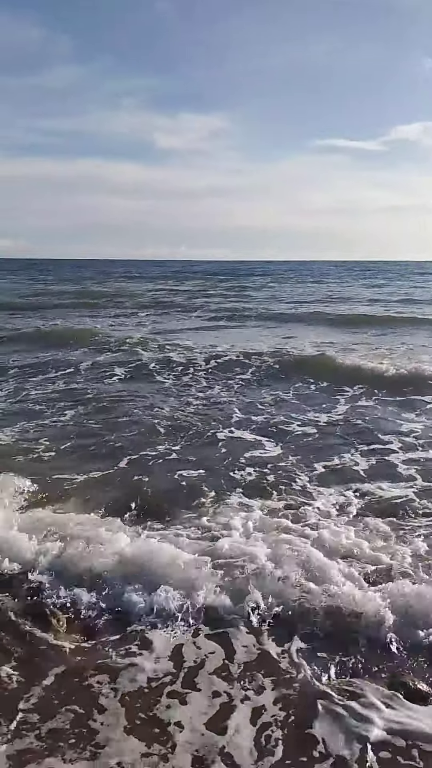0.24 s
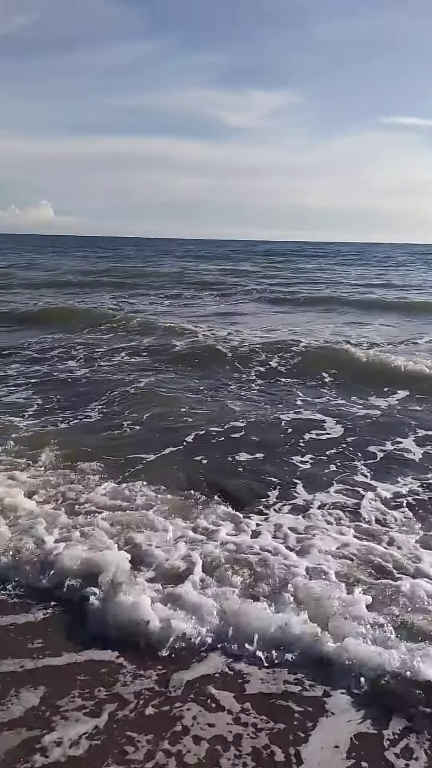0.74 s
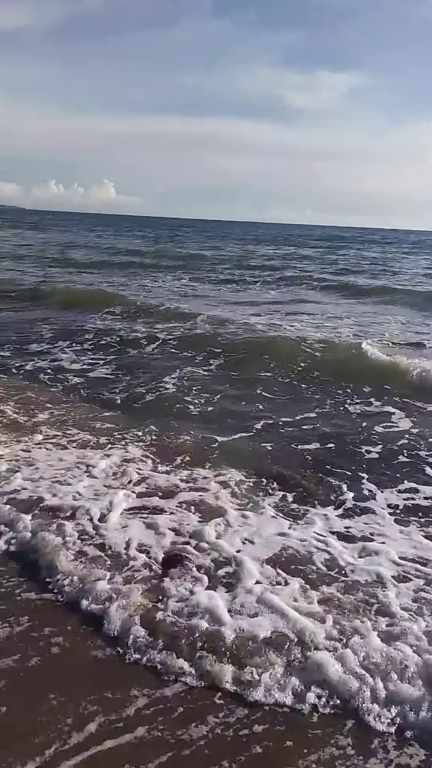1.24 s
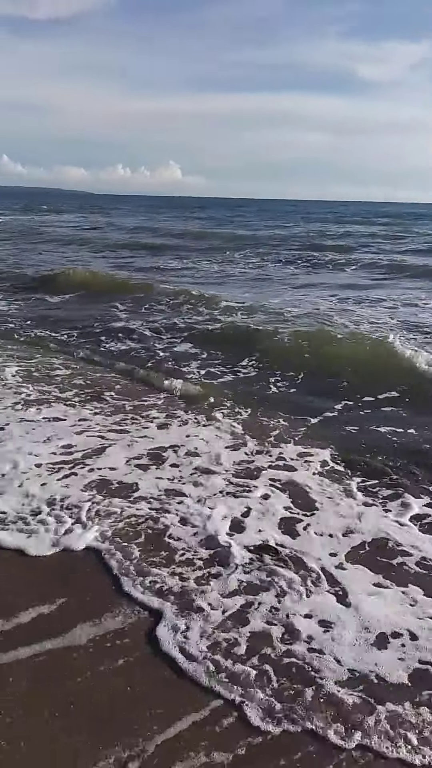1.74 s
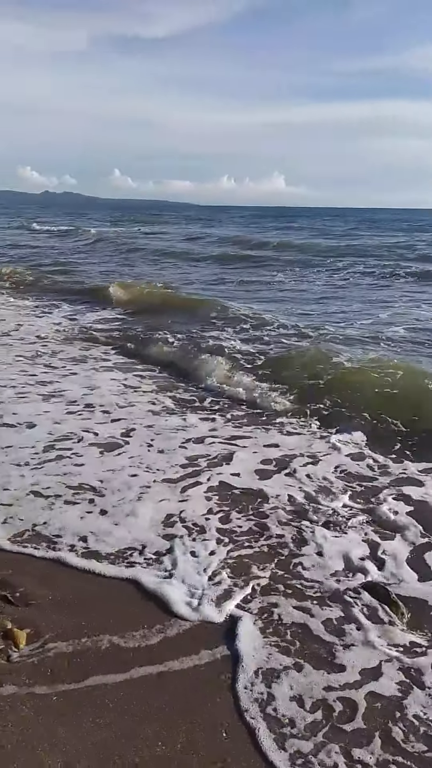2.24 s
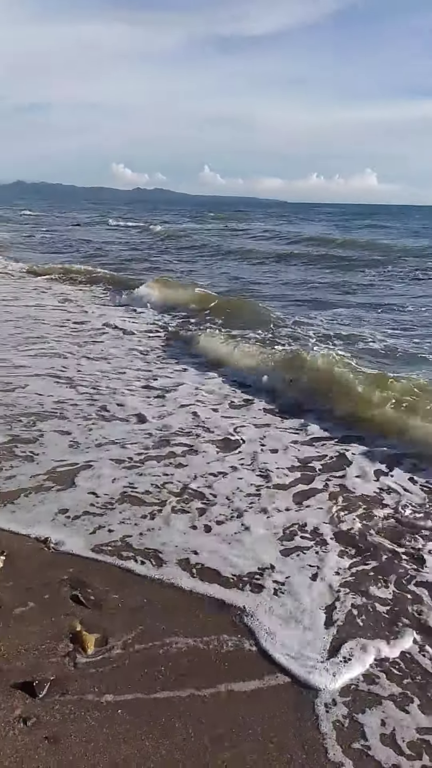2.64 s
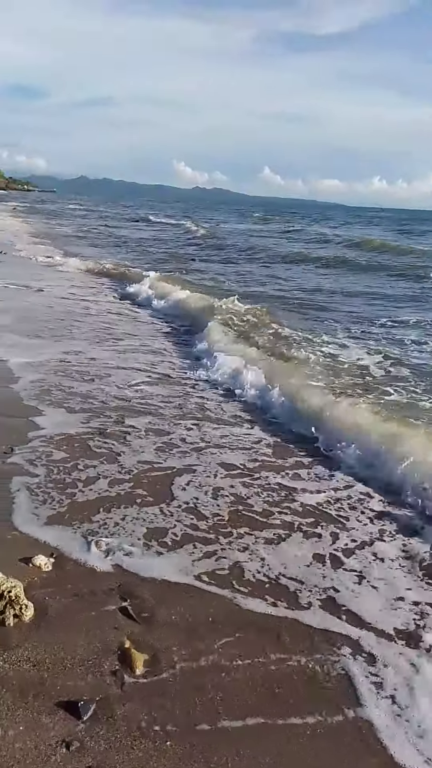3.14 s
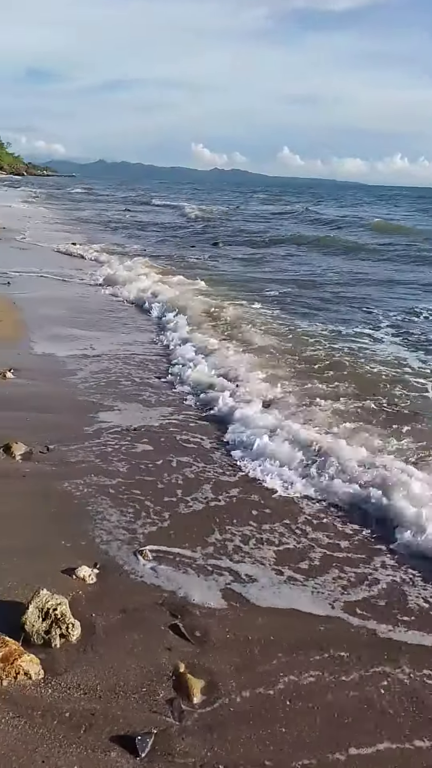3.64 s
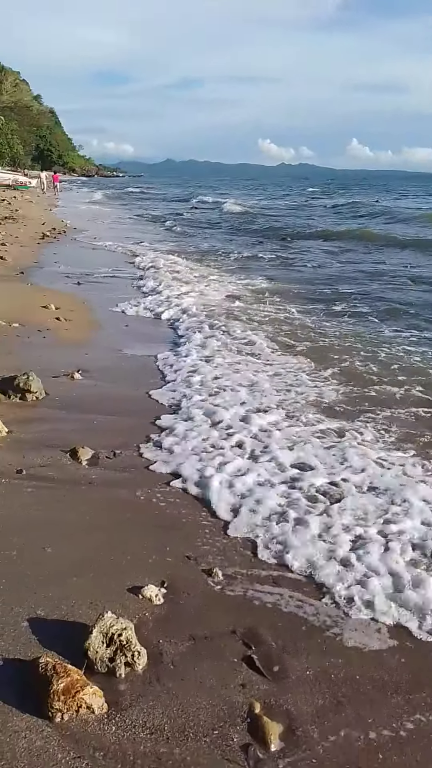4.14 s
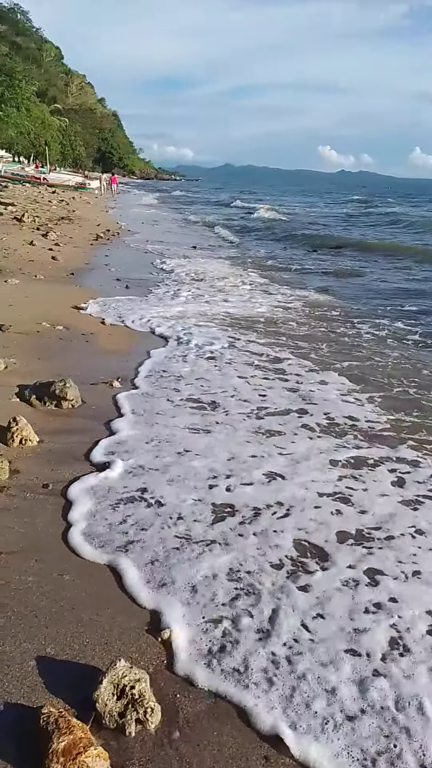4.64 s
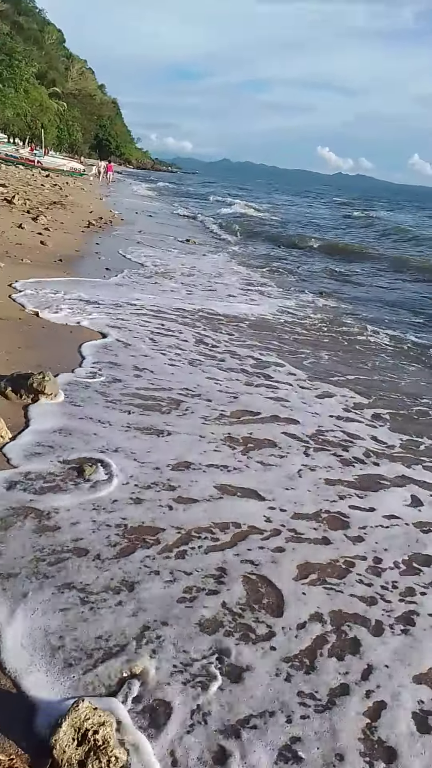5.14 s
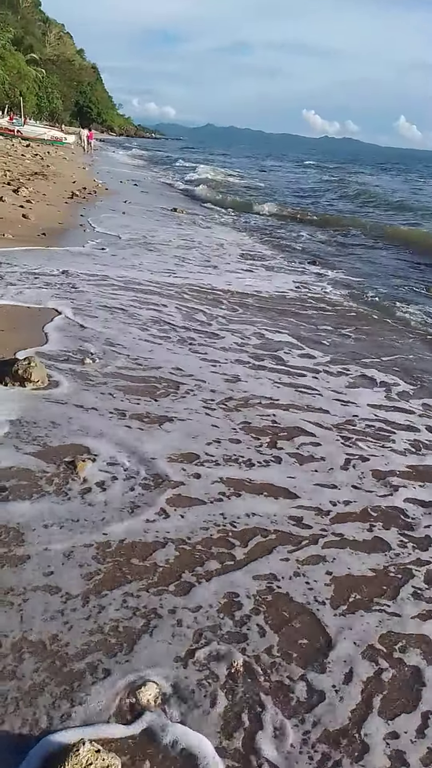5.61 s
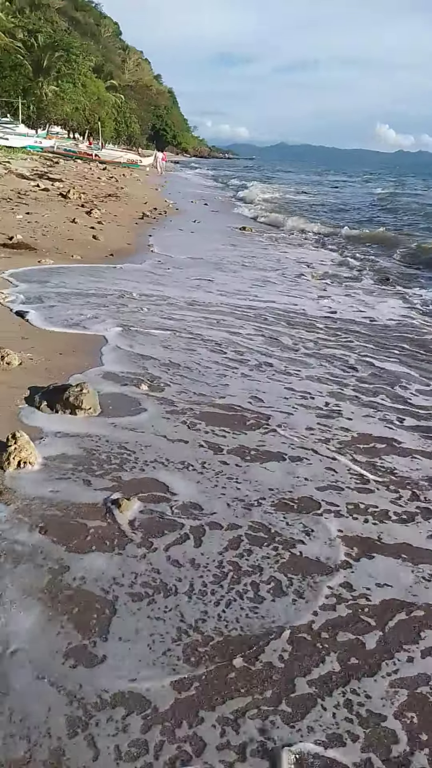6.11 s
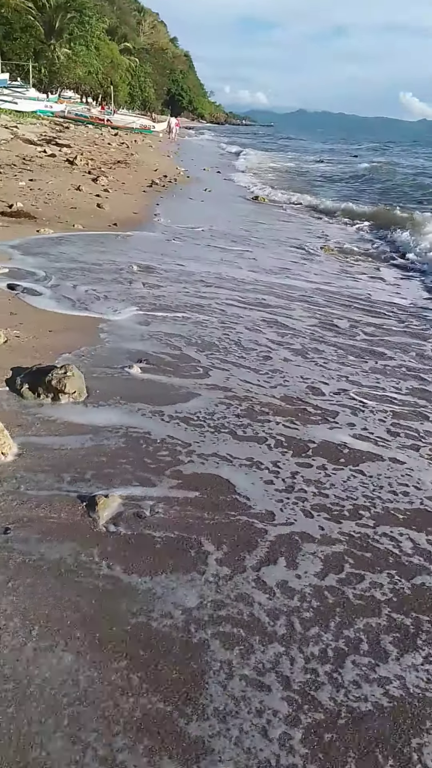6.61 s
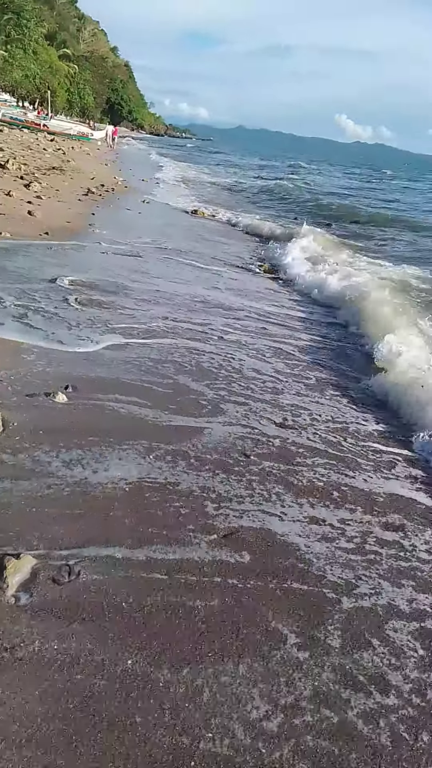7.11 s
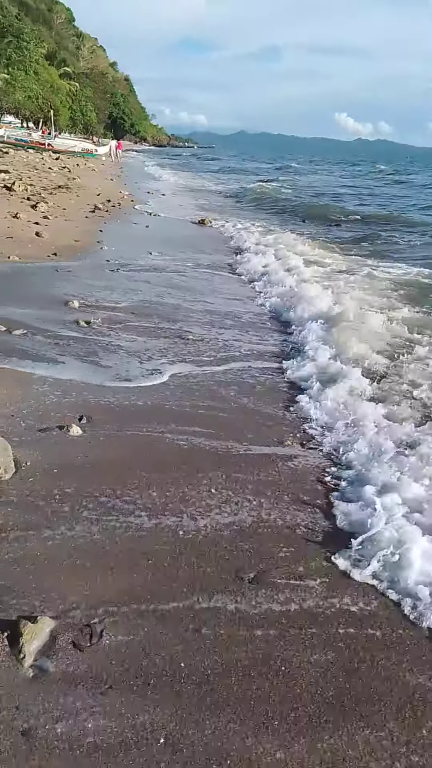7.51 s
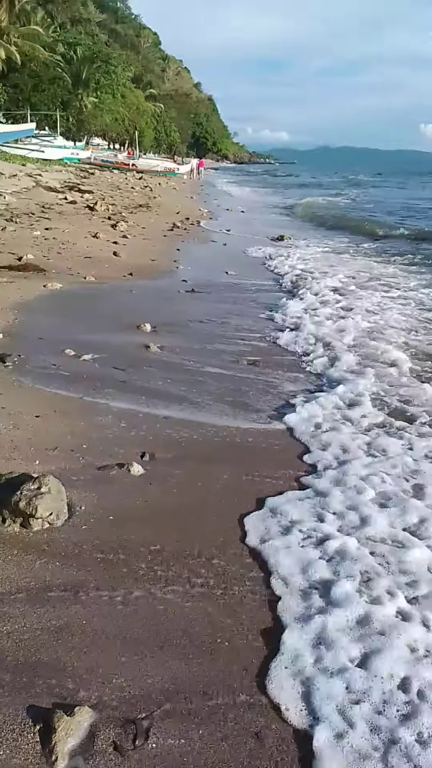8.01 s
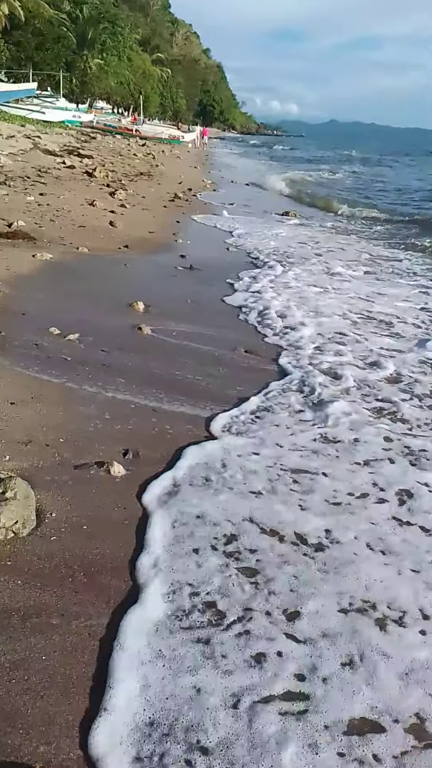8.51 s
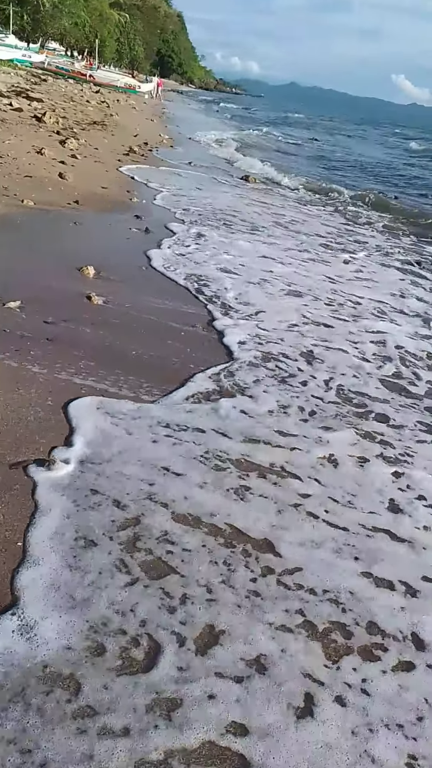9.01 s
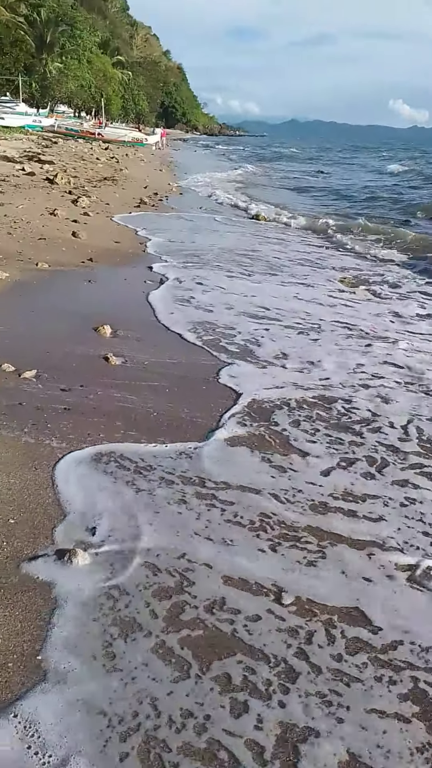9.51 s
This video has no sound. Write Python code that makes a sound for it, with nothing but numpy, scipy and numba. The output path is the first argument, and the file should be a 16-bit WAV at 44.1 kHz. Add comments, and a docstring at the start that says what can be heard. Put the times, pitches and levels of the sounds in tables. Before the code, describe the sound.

Small waves break and wash up a wet sandy shore, a close rushing hiss swelling and ebbing over fizzing foam and a faint low breeze rumble.

```python
"""A wet sandy shore: small waves break a few metres off and run up past a hand-held phone with one microphone.
Trapped air pockets thump, churning water bubbles and foam fizzes: ringing bubbles mixed with rushing noise.
A light breeze rumbles as low noise, with a few short puffs. The phone turns from the sea to the shoreline,
so the colour of the water shifts; the phone's low-cut leaves a notch."""
import sys
import numpy as np
from scipy import signal
from scipy.fft import rfft, irfft
from scipy.io import wavfile
from scipy.ndimage import uniform_filter1d
from numba import njit

SR = 44100
rng = np.random.default_rng(int(sys.argv[2]) if len(sys.argv) > 2 else 0)


def natural_amplitude(level_db):
    """Convert a level in decibels to a linear amplitude factor, elementwise."""
    exponent = np.asarray(level_db, float) / 20
    return 10 ** exponent


def wrap_up_sound(samples):
    """Save the sound to the file named by the first command line argument, as 16-bit audio."""
    columns = np.atleast_2d(samples).T
    # keep every value between -1 and 1, then stretch to whole-number steps
    tamed = np.clip(columns, -1, 1)
    steps = np.round(tamed * 32767).astype(np.int16)
    wavfile.write(sys.argv[1], SR, steps)


N = 430416  # samples in the scene
HZ = np.fft.rfftfreq(N, 1 / SR)


def level(x, db):
    """Scale to an rms of 1, then apply a gain in dB, either steady or changing with time."""
    return x * natural_amplitude(db) / np.sqrt(np.mean(x ** 2))


def curves(table):
    """Turn each table column after the time into one value per sample."""
    s, *columns = np.transpose(table)
    return [np.interp(np.arange(N) / SR, s, column) for column in columns]


def colour(x, points):
    """Filter by (Hz, dB) points joined by straight lines on a log pitch axis."""
    hz, db = np.transpose(points)
    gain_db = np.interp(np.log(HZ + 1), np.log(hz), db)
    return irfft(rfft(x) * natural_amplitude(gain_db), N)


def band(x, lo_hz, hi_hz):
    """Steep band-pass; neighbouring bands add up to even power."""
    low_side = 1 + (lo_hz / (HZ + 1)) ** 16
    high_side = 1 + (HZ / hi_hz) ** 16
    return irfft(rfft(x) / np.sqrt(low_side * high_side), N)


def walk(rate):
    """Random levels, `rate` per second, smoothed into slopes, without slow drift; spread 1."""
    hold = int(SR / rate)
    steps = np.repeat(rng.standard_normal(N // 200)[:N // hold + 1], hold)
    smooth = uniform_filter1d(steps, hold)[:N]
    drift_free = smooth - uniform_filter1d(smooth, 4 * hold)
    return drift_free / drift_free.std()


@njit
def ring(n, start, step, decay, glide, size):
    """Each bubble is a dying sine whose pitch climbs as it nears the surface."""
    y = np.zeros(n)
    for k in range(len(start)):
        # z is a turning arrow: p turns and shrinks it, g speeds up the turning
        z, p, g = size[k] + 0j, decay[k] * np.exp(1j * step[k]), np.exp(1j * glide[k])
        for i in range(start[k], min(n, start[k] + int(5 / (1 - decay[k])))):
            y[i] += z.imag
            z *= p
            p *= g
    return y


def bubbles(lo_hz, hi_hz, rate, cycles, scatter_db, rise=0.275):
    """A random crowd of at most 70000 bubbles, a few louder than the rest."""
    when, pitch, loudness = rng.random((70000, 3)).T[:, :int(rate * N / SR)]
    step = 2 * np.pi * (lo_hz + (hi_hz - lo_hz) * pitch) / SR  # radians per sample
    life = cycles * np.pi / step  # samples in which a bubble dies down by a factor e
    glide = rise * step / (2 * life)  # pitch gains the share `rise` in two lives
    size = natural_amplitude(scatter_db * 3.66 * loudness ** 3) * np.sqrt(step)
    return ring(N, (when * N).astype(np.int64), step, np.exp(-1 / life), glide, size)


# Single tumbles and splashes within a wave; a minus sign makes a dip.
# Columns: peak_s [s], swell_db [dB], centre_hz [Hz]
SPLASHES = [(.2, 2, 2200), (.23, 2, 10000), (.37, 1, 5000), (.42, 1.6, 400), (1.05, 3, 3500),
            (1.12, 1.6, 1800), (1.33, 1, 1800), (1.53, 4, 11000), (2.1, 2.5, 9000), (2.5, 1.8, 3500),
            (2.64, -0.5, 800), (2.78, 2, 600), (3.22, 2.2, 330), (3.36, 2, 7000), (3.64, 1.8, 9000),
            (3.85, 2.5, 900), (3.99, 2, 2000), (4.36, 2, 2500), (5.18, 3, 5000), (6.0, 6, 450),
            (6.14, 1.6, 2000), (6.33, 6.5, 350), (6.98, 2.5, 10000), (7.07, 3, 900), (7.1, 1.5, 3600),
            (7.13, 2.5, 12000), (8.1, 2, 1700), (8.66, 2, 600), (8.93, 3, 5500), (9.47, 0.5, 1500),
            (9.63, 1, 1200)]
SPLASH_RISE_S, SPLASH_FALL_S, SPLASH_OCTAVES = 0.031, 0.031, 0.75


def tumbles(hz):
    """Brief swells in dB, strongest for bubbles near each splash's own pitch."""
    t, swell_db = np.arange(N) / SR, 0
    for peak_s, db, centre_hz in SPLASHES:
        rise = -((t - peak_s) / SPLASH_RISE_S) ** 2
        fall = (peak_s - t) / SPLASH_FALL_S
        shape = np.exp(np.where(t < peak_s, rise, fall))
        nearness = np.exp(-(np.log2(hz / centre_hz) / SPLASH_OCTAVES) ** 2)
        swell_db = swell_db + db * nearness * shape
    return swell_db


# Which way the phone faces. Columns: time_s [s], direction [0 to sea, 1 half turned, 2 along the shore]
PHONE_TURN = [(0, 0), (1.9, 0), (2.7, 1), (4.6, 1), (5.8, 2), (9.76, 2)]
# Colour of the water with the phone facing the sea, half turned, and along the shore.
# Columns of all three: pitch_hz [Hz], level_db [dB per Hz]
SEA_COLOUR = [(700, -0.5), (1060, 1), (1230, -3), (1880, -2.5), (2100, -6), (2380, -4.5), (3310, -9),
              (4400, -8.5), (4950, -15), (6090, -15), (7780, -31.5), (11000, -35.5)]
HALF_TURNED_COLOUR = [(700, -2.5), (939, -1.5), (1140, -4), (1670, -7), (2720, -8.5), (2930, -9),
                      (4170, -13), (4660, -18), (6320, -23), (7880, -34), (10600, -37.5)]
SHORE_COLOUR = [(700, -1.5), (916, 0), (1210, -1), (1590, -3), (3190, -6.5), (4270, -11.5), (4890, -16.5),
                (6240, -20), (7690, -31.5), (10400, -35)]
# Lowest and highest part of the colour, the same from any side. Columns: pitch_hz [Hz], level_db [dB per Hz]
BASS_COLOUR = [(200, 4.6), (260, 4.3), (303, 5.3), (474, 0.31), (602, 1.15)]
TREBLE_COLOUR = [(13000, -44), (15600, -39.5)]


def facing(x):
    """The colour fades from one direction to the next; each colour is set equally loud."""
    turn, total = curves(PHONE_TURN)[0], 0
    for k, side in enumerate((SEA_COLOUR, HALF_TURNED_COLOUR, SHORE_COLOUR)):
        heard = level(colour(x, BASS_COLOUR + side + TREBLE_COLOUR), 0)
        total = total + np.clip(1 - abs(turn - k), 0, 1) * heard
    return total


# The waves over time; brightness is foam bursting near the phone, plunge is air trapped by the falling crest.
# Columns: time_s [s], strength_db [dB], brightness_db [dB], plunge_db [dB]
WAVES = [(0, -23.5, 2.5, 0.5), (.41, -22, 1.5, -0.5), (.9, -25.5, 0.5, -1.5), (1.44, -29.5, -1, 0.5),
         (1.9, -30, 0.5, 0.5), (2.38, -29.5, 1.5, -1.5), (2.6, -27, -0.5, -0.5), (3.0, -26, -1, -0.5),
         (3.42, -24.5, -2, 0.5), (4.0, -27.5, -1, -1.5), (4.4, -29.5, 1, -0.5), (4.75, -32.5, 2, 1.5),
         (5.3, -31, 0, 0.5), (5.9, -29.5, 0.5, 0), (6.35, -25.5, -0.5, 0.5), (6.85, -25, .5, 2),
         (7.1, -23, 1.5, 0), (7.5, -25.5, 0.5, 1), (7.85, -31, 1.5, -0.5), (8.29, -32, 1.5, 0.5),
         (8.81, -29.5, 1, 2.5), (9.27, -30, 2, -1.5), (9.76, -29, 0, 0.5)]
# Bubble sizes, large to small; in `cycles` cycles a bubble dies down by e twice.
# Columns: lowest_hz [Hz], highest_hz [Hz], wanted_rate [bubbles per s], cycles [count],
# scatter_db [dB], bubbles_over_rush_db [dB], flicker_db [dB; minus turns it upside down]
BUBBLE_SIZES = [(184.5, 565, 600, 5.73, 0.5, -9.5, -0.1), (530.4, 1250, 1600, 12.53, 2, -8.5, 0.21),
                (1225, 3200, 4000, 15.47, 1.5, -8, 0.23), (3024, 4940, 4000, 10.5, 1.5, -6, 0.28),
                (4680, 7470, 5000, 9.8, 0.5, -10, 0.34), (7360, 15800, 7800, 20, 2.5, -4.5, 0.5)]
# How each bubble size follows the waves; far_db is far surf that never rests.
# Columns: usual_db [dB at usual strength], swell [dB per dB of strength], sparkle [dB per dB of brightness],
# thump [dB per dB of plunge], far_db [dB]
WAVE_FOLLOW = [(-35, 1.25, -.2, 1, -49.5), (-33.5, 1.13, -0.41, 0.0012, -43.5),
               (-31.5, 0.91, 0.082, 0.0027, -42), (-40, 1.2, 1, 0.093, -53.5),
               (-45, 1.02, 0.38, 0.36, -56.5), (-57, 1.14, 0.3, 0.25, -64.5)]
USUAL_DB = -28  # usual strength of the waves
SLOSH_SHARE, SLOSH_RATE, FLICKER_RATE = 0.87, 34, 44  # rates in random levels per s


def surf():
    """Each bubble size rides its own rush of water; all share one slosh and add a flicker of their own."""
    out, slosh = 0, walk(SLOSH_RATE)
    strength_db, bright_db, plunge_db = curves(WAVES)
    for follow, size in zip(WAVE_FOLLOW, BUBBLE_SIZES):
        usual_db, swell, sparkle, thump, far_db = follow
        lo_hz, hi_hz, rate, cycles, scatter_db, crowd_db, flicker_db = size
        near_db = usual_db + swell * (strength_db - USUAL_DB)
        near_db = near_db + sparkle * bright_db + thump * plunge_db
        near_db = near_db + tumbles(np.sqrt(lo_hz * hi_hz))
        # near and far surf add as powers
        total_db = 10 * np.log10(natural_amplitude(2 * near_db) + natural_amplitude(2 * far_db))
        crowd = level(bubbles(lo_hz, hi_hz, rate, cycles, scatter_db), crowd_db)
        rush = level(rng.standard_normal(N), 0)
        water = facing(band(rush + crowd, lo_hz, hi_hz))
        wobble_db = flicker_db * (slosh * SLOSH_SHARE + walk(FLICKER_RATE))
        out = out + level(water * natural_amplitude(wobble_db), total_db)
    return out


# Gusts over time, before the boost below. Columns: time_s [s], strength_db [dB]
GUSTS = [(0, -52), (.4, -55), (.9, -51), (1.05, -42.5), (1.25, -49), (1.42, -46), (1.58, -56), (2.0, -54.5),
         (2.5, -52.5), (2.9, -55), (3.5, -56), (4.5, -55.5), (4.75, -60), (5.4, -59.5), (5.85, -55),
         (6.2, -63), (6.5, -59), (6.8, -54), (7.25, -60), (7.55, -55), (8.05, -67), (8.45, -61),
         (8.65, -53), (8.95, -53), (9.1, -64), (9.76, -57)]
# Colour of the moving air. Columns: pitch_hz [Hz], level_db [dB per Hz]
AIR_COLOUR = [(20, -36), (33, -20), (50, -7), (70, -6.5), (100, 2), (150, 4.5), (220, -16), (400, -41)]
# The turning hand shields the port from deep buffeting. Columns: time_s [s], change_db [dB]
HAND_SHELTER = [(0, 2), (.8, 2), (2.6, 0), (3.1, -4), (5.5, -4), (6.1, -12), (7.6, -9), (8.3, -6),
                (9.76, -11)]
# Sudden puffs of air on the port, before the boost below. Columns: start_s [s], size_db [dB]
AIR_PUFFS = [(6.585, -48), (7.357, -61), (8.885, -56)]
PUFF_HZ, PUFF_S = 81, .02  # pitch; time from start to fullest, also its width
USUAL_GUST_DB, DEEP_DB, DEEP_FOLLOW = -56.5, -62, .45  # deep buffeting follows gusts in part
BOOST_DB = 8  # the low-cut will take some of the gusts and puffs away


def breeze():
    """Air rolling over the microphone port makes wobbling low noise; puffs are short low-pitched swings."""
    gust_db = curves(GUSTS)[0]
    air = colour(rng.standard_normal(N), AIR_COLOUR) * natural_amplitude(1.2 * walk(19))
    deep_db = DEEP_DB + DEEP_FOLLOW * (gust_db - USUAL_GUST_DB) + curves(HAND_SHELTER)[0]
    deep = level(band(air, 25, 64), deep_db)
    gusts = level(band(air, 65, 400), gust_db)
    t, puffs = np.arange(N) / SR, 0
    for start_s, size_db in AIR_PUFFS:
        shape = np.exp(-((t - start_s - PUFF_S) / PUFF_S) ** 2)
        puffs = puffs + natural_amplitude(size_db) * shape * np.sin(2 * np.pi * PUFF_HZ * (t - start_s))
    return deep + natural_amplitude(BOOST_DB) * (gusts + puffs)


def scene():
    """One microphone feeds both channels."""
    return np.tile(surf() + breeze(), (2, 1))


def roll_off(x):
    """The treble ends steeply here."""
    return signal.sosfilt(signal.butter(12, 16910, fs=SR, output="sos"), x)


def record(dry):
    """The low-cut has a notch just under its corner; deeper bass leaks through weakened; the top is cut off."""
    notch_hz, corner_hz, corner_q, top_hz = 164, 188.5, 0.88, 15720
    hz = np.fft.rfftfreq(2 * N, 1 / SR)
    s = 1j * hz
    notch = s ** 2 + .05 * notch_hz * s + notch_hz ** 2
    corner = s ** 2 + s * corner_hz / corner_q + corner_hz ** 2
    response = notch / corner * (hz < top_hz)
    # mirrored in time so that the ends meet without a jump
    mirrored = np.concatenate([dry, dry[:, ::-1]], axis=1)
    mix = irfft(rfft(mirrored) * response, 2 * N)[:, :N]
    return roll_off(mix)


dry = scene()
out = record(dry)
wrap_up_sound(out)
```